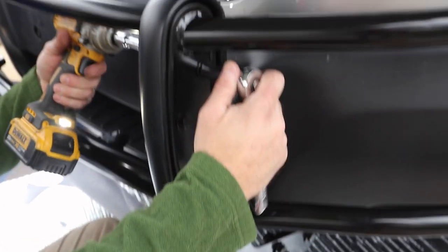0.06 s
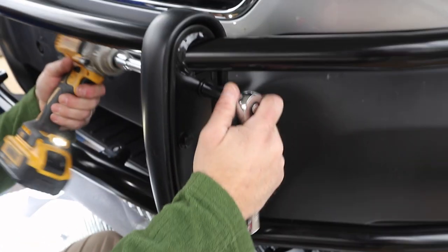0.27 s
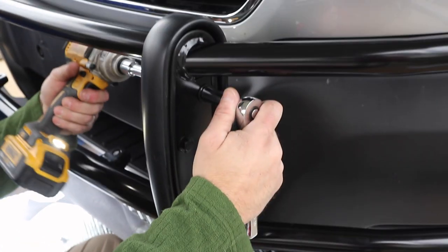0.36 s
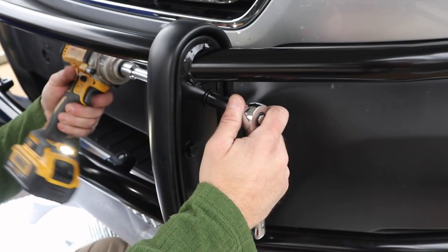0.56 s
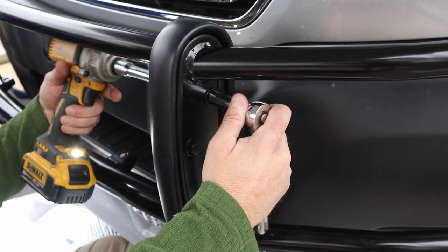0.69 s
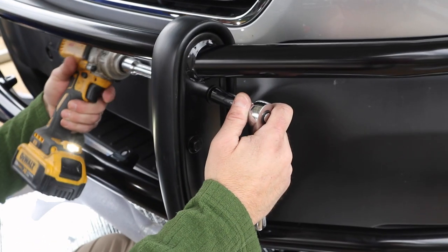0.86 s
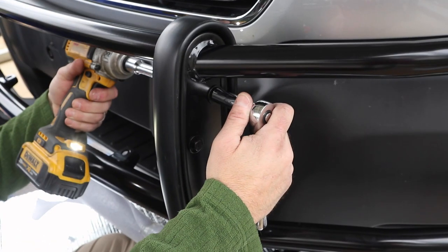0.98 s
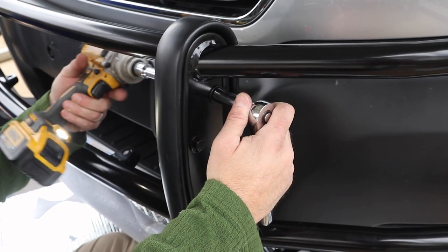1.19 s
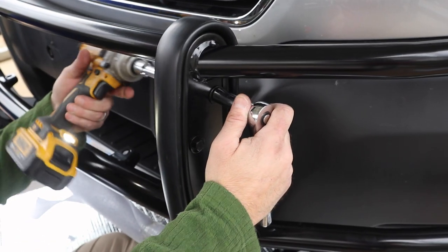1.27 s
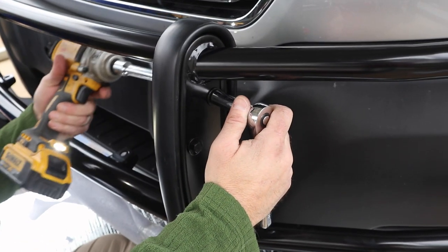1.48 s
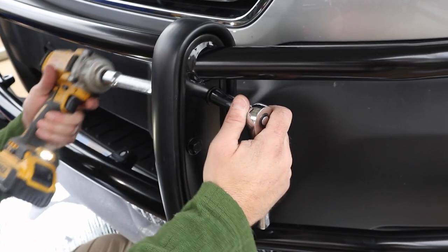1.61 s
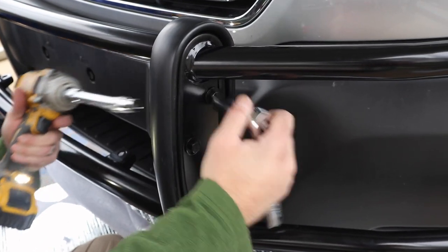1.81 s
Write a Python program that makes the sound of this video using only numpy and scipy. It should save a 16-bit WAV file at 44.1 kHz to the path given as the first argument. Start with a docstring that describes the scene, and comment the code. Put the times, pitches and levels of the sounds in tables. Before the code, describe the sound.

Close to the microphone in a workshop, a cordless drill spins up and its clutch slips with loud, rapid clacks. After a short pause it clacks again, then soft metal clinks and handling noises follow.

```python
"""A few light rattles, then a cordless drill whines up and tightens a bolt on a steel bumper guard.
The bolt seats and the clutch ratchets in hard clacks; a second squeeze ratchets at once.
Tool and steel ring faintly, and hands and a sleeve shift as the socket is pulled off.
One microphone, close to the drill, in a workshop with a short echo."""
import sys
import numpy as np
from scipy import signal
from scipy.fft import rfft, irfft
from scipy.io import wavfile

SR = 44100
rng = np.random.default_rng(int(sys.argv[2]) if len(sys.argv) > 2 else 0)


def log_audio(samples):
    """Write samples as a 16-bit WAV file to the path given in sys.argv[1]."""
    # one column per channel
    frames = np.atleast_2d(samples).T
    # limit to full scale, then quantise
    limited = np.clip(frames, -1, 1)
    pcm = np.round(limited * 32767).astype(np.int16)
    wavfile.write(sys.argv[1], SR, pcm)


N = 81585
TIME, BIN_HZ = np.arange(N) / SR, np.fft.rfftfreq(N, 1 / SR)

# Clutch clacks and drive rattles.
# Each row: start in seconds, level in dB, contact in seconds, treble tilt in dB per octave.
CLUTCH_BLOWS = [(.0003, -35, 0.005, -4), (0.0223, -37, 0.0048, -6), (0.0464, -32, 0.0014, -5.5),
                (0.07, -36.5, 0.0027, -7.5), (0.0941, -43.5, .0025, -10), (0.1203, -43, 0.003, -6),
                (0.2309, -15.5, 0.0013, 0), (0.4204, -3, 0.003, 1.5), (.447, -9, .0025, 1.5),
                (0.473, -8.5, 0.00095, 1.5), (0.4966, -9, 0.00046, 1.5), (0.5197, -11, 0.0011, 2.5),
                (.543, -20, 0.0043, 2.5), (.587, -26, 0.006, 3.5), (0.6491, -44, 0.0047, -3),
                (1.08, -18, 0.004, -0.85), (1.1058, -12, 0.0023, 0.5), (1.1298, -13.5, 0.002, -2),
                (1.153, -11, 0.0015, 2), (1.174, -19, 0.0044, 0), (1.2034, -22, 0.00067, -0.5),
                (1.234, -28, 0.0018, -2)]


def clutch():
    """The slipping clutch and the rattling drive strike the gear case."""
    # Spectrum of a clack. Each row: frequency in Hz, level in dB.
    clack_colour = [(40, -24), (130, -25), (320, -20.5), (600, -12.5), (1250, -6.5), (1750, -0.5),
                    (3600, -2), (4700, -1), (6100, -7), (8300, 2), (10400, -10.5), (12300, -7.5),
                    (13800, -12), (15700, -10)]
    # Short resonances of the gear case. Each row: frequency in Hz, width in Hz, gain in dB.
    case_resonances = [(930, 210, -1), (1680, 110, -3.5), (2070, 80, -7.5), (2827, 70, -1.5),
                       (3520, 160, 3.5), (5650, 110, 4), (6750, 220, -1.5), (7760, 200, -5.5),
                       (8700, 150, -3)]
    return blows(CLUTCH_BLOWS, clack_colour, case_resonances)


def thumps():
    """Hard clacks carry a low push that grows faster than their level."""
    width_s, lag_s = .0012, .00067
    u = np.arange(-400, 400) / SR / width_s
    push = u * np.exp(.5 - u ** 2 / 2)
    out = np.zeros(N)
    for start, db, _, _ in CLUTCH_BLOWS:
        add(out, start + lag_s - len(u) / 2 / SR, amp(-30 + 1.2 * db) * push)
    return out


def whine():
    """Gear mesh and motor partials follow the speed, which sags as the bolt seats."""
    # The first run-up. Each row: time in seconds, gear mesh in Hz, drive whine level in dB.
    speed = [(.214, 597.3, -63), (.238, 1040, -39.5), (.251, 1282, -30.5), (.268, 1524, -43.5),
             (.29, 1653, -37.5), (.31, 1662, -26.5), (.332, 1674, -30), (.36, 1796, -26.5),
             (.376, 1779, -29), (.392, 1745, -23), (.41, 1650, -23.5), (.425, 1700, -47), (.47, 1643, -63)]
    # Partials of drive and motor. Each row: multiple of the mesh, relative level in dB, waver in radians.
    drive_partials = [(.305, -23, .5), (.62, -16, .5), (1, 0, .12), (1.155, -16, .7)]
    motor_partials = [(1.96, -37, 1.7), (2.91, -33, 0.4), (3.93, -41, 3.4), (4.88, -35, 0.99),
                      (5.88, -47.5, 2), (6.86, -39.5, 2), (7.84, -44.5, 1.6)]
    # How the housing passes the motor's partials. Each row: frequency in Hz, gain in dB.
    housing = [(1800, -1.5), (2650, -2), (3400, 0), (4600, 1.5), (5700, -17), (7000, -9), (8100, -1.5),
               (10000, -11), (11700, -3), (12800, -3), (14000, -21)]
    times, mesh_hz, whine_db = np.transpose(speed)
    angle = 2 * np.pi * np.cumsum(np.interp(TIME, times, mesh_hz)) / SR

    def partials(table, flutter_db):
        """Wavering, fluttering sines on multiples of the mesh."""
        out = np.zeros(N)
        for multiple, db, waver in table:
            flutter = unit_rms(amp(flutter_db * wander(hz=196)))
            out += amp(db) * flutter * np.sin(multiple * angle + waver * wander(hz=110))
        return np.sqrt(2) * out

    on_s, off_s, fade_s = .232, .428, .018
    running = np.clip(np.minimum(TIME - on_s, off_s - TIME) / fade_s, 0, 1)
    spin_up = amp(10.5 * np.exp(-((TIME - on_s) / .017) ** 2))
    motor = coloured(running * spin_up * partials(motor_partials, flutter_db=3.5), housing)
    drive = envelope(np.c_[times, whine_db]) * partials(drive_partials, flutter_db=1.5)
    return drive + motor


def gears():
    """Grainy gear noise: brighter once the clutch slips, losing its fizz as the motor stops."""
    # One curve for each squeeze of the trigger. Each point: time in seconds, level in dB.
    squeezes = [
        [(.208, -67), (.218, -47.5), (.229, -33.5), (.245, -32), (.28, -33), (.37, -30.5), (.41, -26),
         (.46, -34.5), (.53, -33), (.58, -33), (.625, -38.5), (.675, -55.5), (.76, -71.5)],
        [(1.035, -72), (1.072, -46), (1.088, -30.5), (1.12, -28), (1.165, -31), (1.19, -38), (1.225, -51),
         (1.28, -56.5), (1.35, -74.5)],
    ]
    # Gear noise under drive and when coasting. Each row: frequency in Hz, level in dB.
    drive_colour = [(40, -41.5), (120, -8.5), (350, -14), (1000, -6.5), (2000, -1.5), (2900, -5), (3600, 4),
                    (4900, -8), (5800, -8.5), (7900, -4.5), (10300, -24.5), (12000, -8.5), (15500, -19)]
    coast_colour = [(40, -30), (300, -8.5), (900, -5), (1600, -1.5), (3300, 2), (6200, -1), (7800, 4),
                    (9000, -1.5), (9900, -10), (12300, -10.5), (14000, -15), (15500, -11.5)]
    crossfade_s, grain_db, full_fizz_db = .1, 3, -42
    low_pass = signal.butter(4, 9300, fs=SR, output="sos")
    out = np.zeros(N)
    for curve, coast_s in zip(squeezes, (.45, 1.157)):
        gain = envelope(curve)
        coast = np.clip((TIME - coast_s) / crossfade_s + .5, 0, 1)
        hiss = np.sqrt(1 - coast) * noise(drive_colour) + np.sqrt(coast) * noise(coast_colour)
        hiss = unit_rms(hiss * amp(grain_db * wander(hz=750)))
        dull = signal.sosfiltfilt(low_pass, hiss)
        fizz = np.minimum(gain / amp(full_fizz_db), 1) ** .6
        out += gain * (dull + fizz * (hiss - dull))
    return out


def drill_ring(shaking):
    """The drill's clutch and housing ring on in clusters of close modes."""
    # Each row: frequency in Hz, relative level in dB, seconds to fall 60 dB.
    modes = [(520, -1, 0.24), (1637, -8.5, .2), (2804, -0.5, 0.2), (7530, -1.5, .26), (8620, -8, .15)]
    return amp(-56.5) * ring(shaking, clusters(modes, spread=.0062, count=7))


def handling():
    """The socket and hands knock softly on the guard."""
    # Each row: start in seconds, level in dB, contact in seconds, treble tilt in dB per octave.
    knocks = [(.169, -55.5, 0.0029, -8), (.7435, -55.5, 0.0044, -10), (.761, -54, 0.0085, -4),
              (.943, -65, .001, 7.5), (1.012, -63.5, 0.0032, -8.5), (1.037, -58.5, 0.0078, -2),
              (1.335, -53, 0.006, 1.5), (1.359, -60.5, .008, 0.5), (1.514, -69, .003, 0.5),
              (1.545, -52, .004, -9), (1.564, -60, 0.0037, -8), (1.676, -66.5, .004, 11),
              (1.807, -63.5, 0.0019, 5.5), (1.845, -60, .005, 3.5)]
    # Spectrum of a knock. Each row: frequency in Hz, level in dB.
    knock_colour = [(60, -25), (180, -12.5), (450, -3.5), (1000, 1), (1800, -4), (2900, 4.5), (5000, -3),
                    (8000, -12.5), (15000, -27.5)]
    return blows(knocks, knock_colour, resonances=[])


def socket():
    """Light blows set the socket ringing on the bolt."""
    # Each row: start in seconds, level in dB.
    clinks = [(.0705, -53.5), (.761, -62.5), (1.234, -49.5), (1.335, -55)]
    # Each row: frequency in Hz, relative level in dB, seconds to fall 60 dB.
    modes = [(1028, -19.5, .44), (2363, -12, .8), (2730, 2, 0.11), (3044, -14, 0.14), (3490, -9.5, 0.45),
             (4900, -9, 0.08)]
    return ring(taps(clinks), modes)


def guard():
    """Nudges draw a dull boom from the guard and bumper."""
    # Each row: start in seconds, level in dB.
    nudges = [(.002, -53.5), (.169, -67), (.745, -59.5), (1.49, -68.5)]
    # Each row: frequency in Hz, relative level in dB, seconds to fall 60 dB.
    modes = [(135, -8, .5), (180, -2.5, 0.22), (223, -9, 0.69), (326, -10, 0.12), (399, -8.5, 0.22),
             (565, -4.5, .14), (870, -2, .1)]
    return ring(taps(nudges), clusters(modes, spread=.045, count=4))


def sleeve():
    """Cloth rubs unevenly as the drill is drawn away."""
    # Each row: time in seconds, level in dB.
    rubbing = [(1.4, -86), (1.5, -80), (1.56, -66), (1.65, -76.5), (1.71, -68.5), (1.85, -69)]
    # Each row: frequency in Hz, level in dB.
    cloth_colour = [(100, -10.5), (900, -3.5), (3500, -0.5), (6000, -6.5), (8500, -3.5), (10500, -16),
                    (15500, -13)]
    return envelope(rubbing) * unit_rms(noise(cloth_colour) * amp(2.33 * wander(hz=150.6)))


def opening_ring():
    """The workshop still rings as the sound opens: a wash of noise dying quickly."""
    # Each row: frequency in Hz, level in dB.
    wash_colour = [(40, -17.5), (150, -0.5), (400, -14), (900, -3.5), (3300, 3.5), (5500, -9.5),
                   (8500, -9.5), (10500, -14.5), (13000, -12), (15500, -29)]
    return amp(-46.5 - 150 * TIME) * noise(wash_colour)


def workshop_echo(sound):
    """Diffuse workshop tail, each band dying at its own speed."""
    # Each row: frequency in Hz, seconds to fall 60 dB.
    decay_times = [(100, .7), (400, 0.25), (1500, 0.16), (4000, 0.19), (8000, 0.11), (15000, 0.41)]
    hz, t, bands = signal.stft(rng.standard_normal(SR), SR, nperseg=256)
    decay = np.exp(-np.log(1000) * t / at_hz(decay_times, hz)[:, None])
    tail = signal.istft(bands * decay, SR, nperseg=256)[1][:SR]
    tail *= np.minimum(TIME[:SR] / .004, 1)
    return signal.fftconvolve(sound, tail / np.linalg.norm(tail))[:N]


def room_tone():
    """A faint, steady rumble lies under everything."""
    # Each row: frequency in Hz, level in dB.
    rumble_colour = [(25, -13.5), (70, -4), (130, 7), (190, 2.5), (300, -9.5), (1000, -8.5), (3000, -18),
                     (8000, -25), (15000, -41.5)]
    return amp(-71.5) * noise(rumble_colour)


def blows(table, colour, resonances, size=3000):
    """Each blow chatters while the parts touch, stops quickly and leaves a short rattle."""
    fall_s, rattle_s = .0013, .009
    out, t = np.zeros(N), np.arange(size) / SR
    rattle = amp(-10.5) * np.exp(-t / rattle_s)
    for start, db, contact_s, tilt_db in table:
        contact = np.exp(-np.maximum(t - contact_s, 0) / fall_s)
        chatter = rng.choice([-1., 1.], size) * np.hypot(contact, rattle)
        add(out, start, amp(db) * signal.fftconvolve(chatter, body(colour, tilt_db, resonances)))
    return out


def body(colour, tilt_db, resonances, size=4096):
    """Causal response of a struck body: colour, tilt and resonances, with energy 1."""
    hz = np.fft.rfftfreq(size, 1 / SR)
    gain = amp(at_hz(colour, hz) + tilt_db * np.log2(1 + hz / 900))
    gain *= 1 + sum(amp(db) / (1 + (2 * (hz - f) / width) ** 2) for f, width, db in resonances)
    log_gain = np.log(np.r_[gain, gain[-2:0:-1]])
    minimum_phase = np.exp(np.conj(signal.hilbert(log_gain)))
    response = np.fft.ifft(minimum_phase).real[:size // 2]
    return response / np.linalg.norm(response)


def ring(shaking, modes):
    """A body rings on in its modes after whatever shakes it."""
    t = TIME[:SR]
    tail = sum(amp(db) * np.exp(-np.log(1000) * t / t60) * np.sin(2 * np.pi * hz * t)
               for hz, db, t60 in modes)
    return signal.fftconvolve(shaking, tail)[:N]


def clusters(modes, spread, count):
    """Splits each mode into close neighbours that share its energy."""
    return [(hz * (1 + spread * rng.uniform(-1.1, 1.1)), db - 10 * np.log10(count), t60)
            for hz, db, t60 in modes for _ in range(count)]


def taps(table):
    """One sharp push for each row of seconds and dB."""
    out = np.zeros(N)
    for start, db in table:
        add(out, start, amp([db]))
    return out


def noise(colour):
    """Steady noise of a given colour, at rms 1."""
    return unit_rms(coloured(rng.standard_normal(N), colour))


def wander(hz):
    """Smooth random motion up to a rate, at rms 1."""
    return unit_rms(irfft(rfft(rng.standard_normal(N)) * np.exp(-(BIN_HZ / hz) ** 2), N))


def coloured(sound, colour):
    """Filters a sound by a curve of Hz and dB."""
    return irfft(rfft(sound) * amp(at_hz(colour, BIN_HZ)), N)


def at_hz(points, hz):
    """Reads a table on a log-frequency axis."""
    f, value = np.transpose(points)
    return np.interp(np.log(hz + 1), np.log(f + 1), value)


def envelope(points):
    """Gain over time from points of seconds and dB, silent outside them."""
    return amp(np.interp(TIME, *np.transpose(points), left=-200, right=-200))


def add(mix, start_s, sound):
    """Mixes a sound in at its start time."""
    part = mix[max(round(start_s * SR), 0):][:len(sound)]
    part += sound[:len(part)]


def amp(db):
    """Decibels to gain."""
    return 10 ** (np.asarray(db) / 20)


def unit_rms(x):
    """Scales to rms 1."""
    return x / np.sqrt(np.mean(x ** 2) + 1e-20)


def scene():
    """The drill up close; knocks spread through the guard and reach more of the room."""
    drill = clutch() + gears()
    near = drill + drill_ring(drill) + thumps() + whine() + sleeve()
    knocks = handling()
    steel = socket() + guard()
    opening = opening_ring()
    echo = workshop_echo(amp(-16) * near + amp(-4.5) * knocks)
    return (near + knocks + steel + echo + opening + room_tone())[None]


def record(dry):
    """The loudest clack overloads the microphone input; then the top treble is cut off."""
    clipped = np.clip(dry, -1, 1)
    low_pass = signal.firwin(511, 15850, window=("kaiser", 9), fs=SR)
    return signal.oaconvolve(clipped, low_pass[None], "same")


dry = scene()
out = record(dry)
log_audio(out)
```